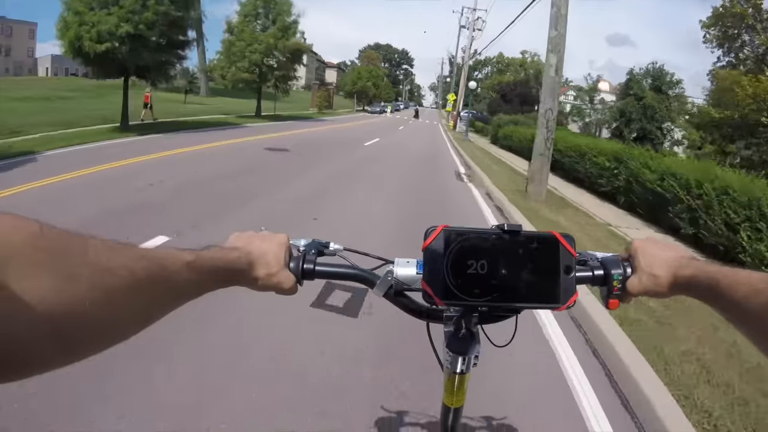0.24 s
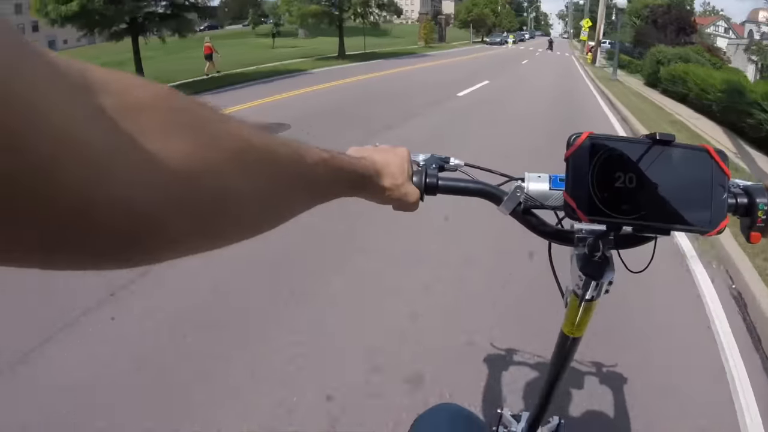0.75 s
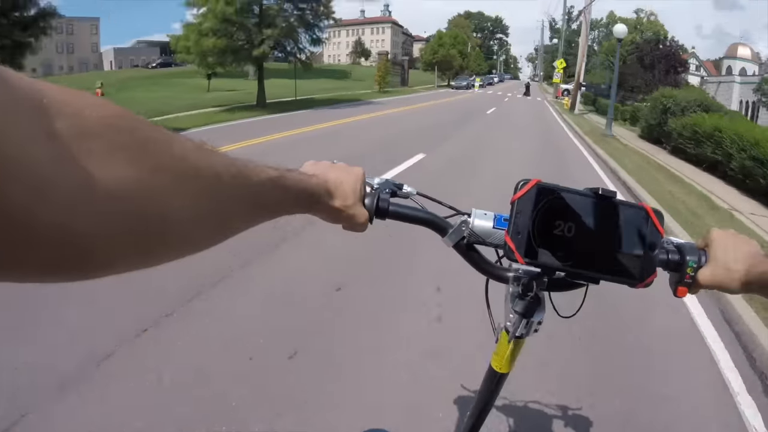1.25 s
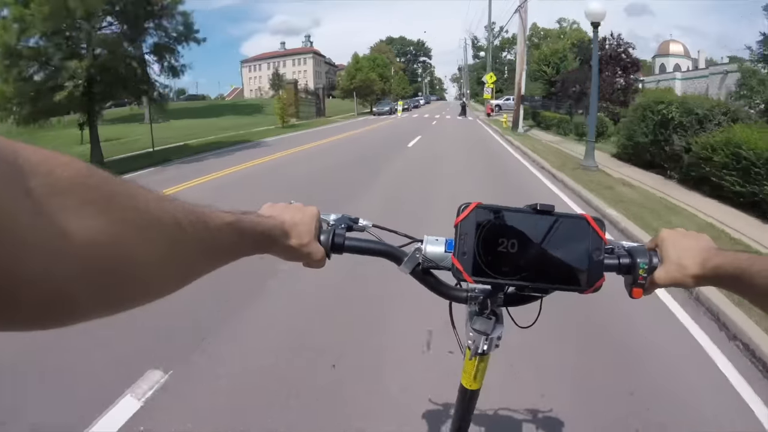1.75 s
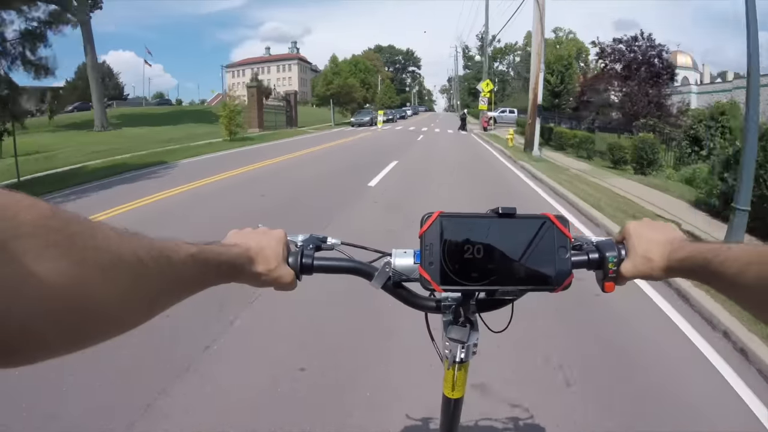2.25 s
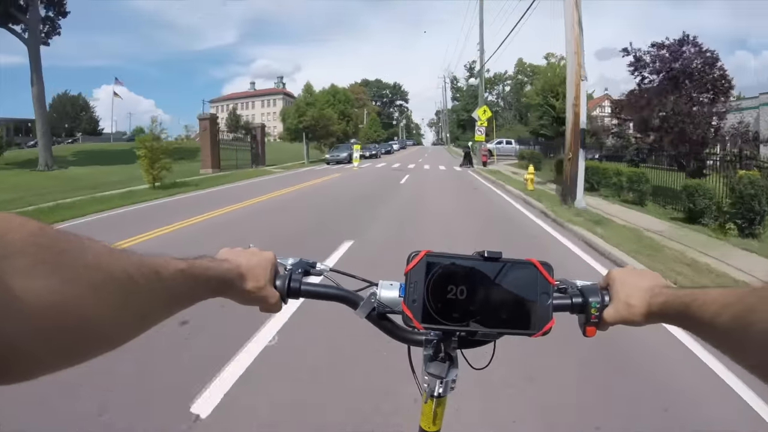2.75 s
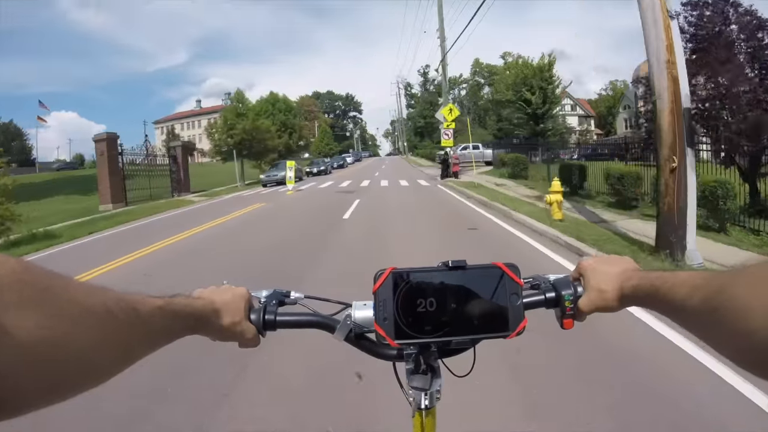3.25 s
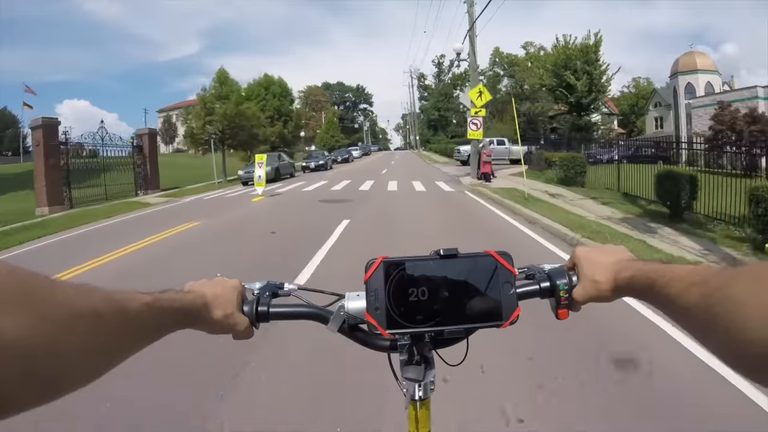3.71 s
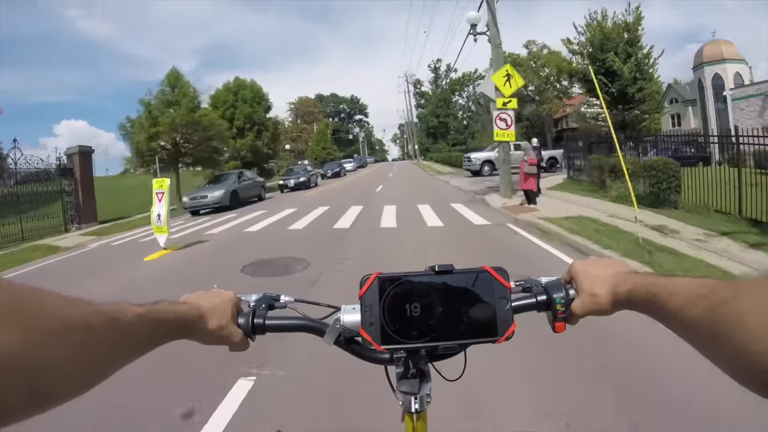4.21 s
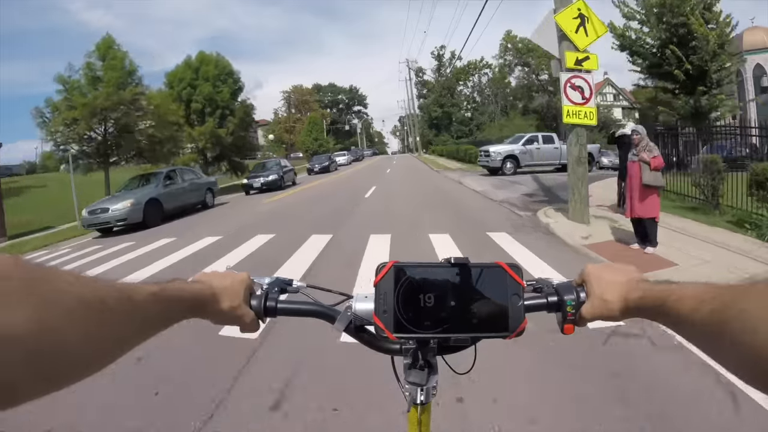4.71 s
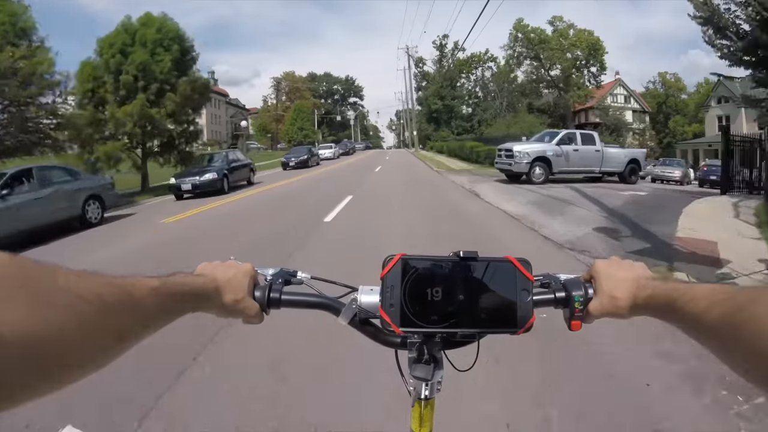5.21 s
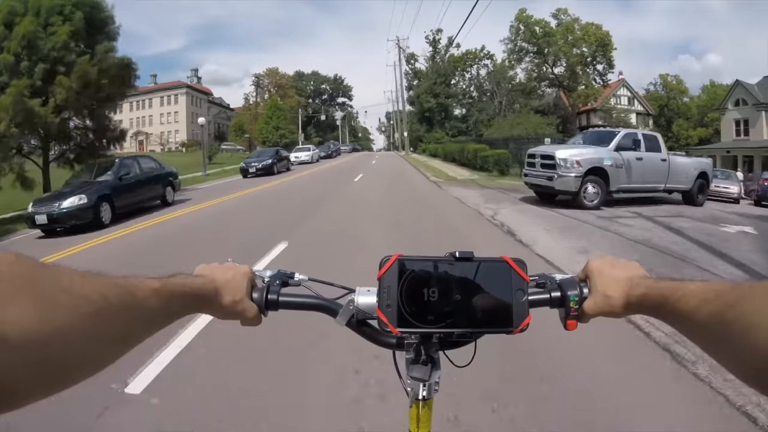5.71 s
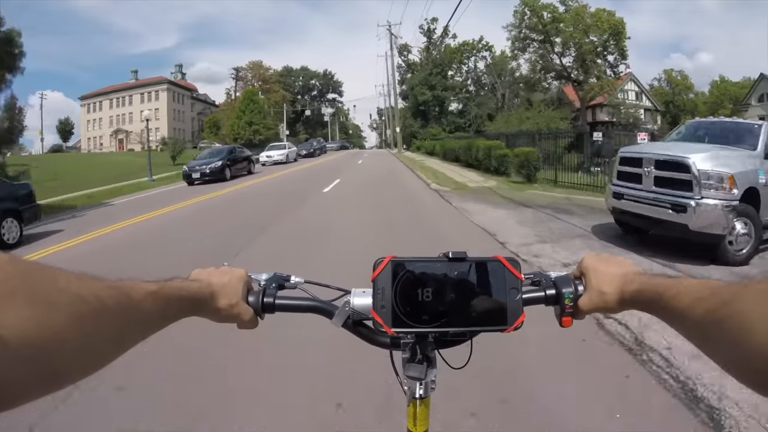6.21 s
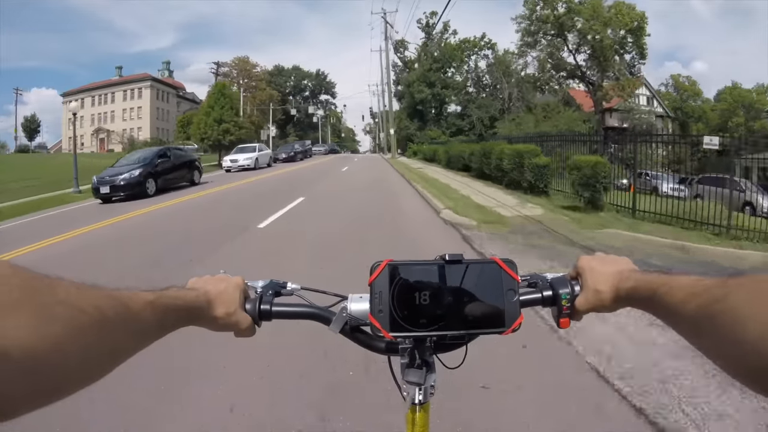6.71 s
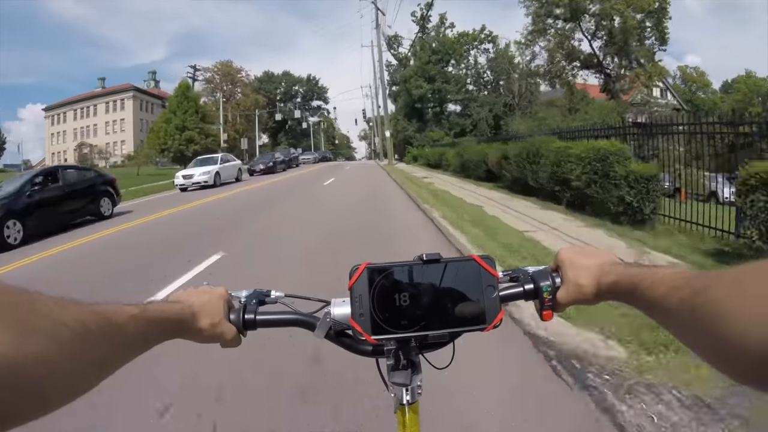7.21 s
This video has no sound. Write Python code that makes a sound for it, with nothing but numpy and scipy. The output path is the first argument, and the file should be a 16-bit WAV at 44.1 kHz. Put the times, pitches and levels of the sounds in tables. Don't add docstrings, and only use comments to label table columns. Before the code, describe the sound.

An electric scooter rides along an open road, heard from the rider's helmet. A constant mid-pitched drive whine with higher overtones wavers quickly as the wheel turns and drifts slightly lower. Beneath it lie tyre roar and thin hiss. Low wind gusts thump the microphone throughout, irregular and sometimes hard. Midway a loose part ticks briefly, and later the deck drums softly over painted stripes.

```python
import sys
import numpy as np
from scipy import signal
from scipy.fft import rfft, irfft, next_fast_len
from scipy.io import wavfile
from scipy.ndimage import uniform_filter1d

SR = 44100
rng = np.random.default_rng(int(sys.argv[2]) if len(sys.argv) > 2 else 0)


def bounce(signal):
    frames = np.transpose(np.atleast_2d(signal))
    limited = np.clip(frames, -1, 1)
    pcm = np.round(limited * 32767).astype(np.int16)
    wavfile.write(sys.argv[1], SR, pcm)


def linear_from_db(decibels):
    return 10 ** (np.asarray(decibels, float) / 20)


N = 328646
TEETH = 55
MEAN_PULL_DB = -25

# (time [s], tooth rate [Hz], pull as tone level [dB])
DRIVE = [(0.0, 644.7, -25), (0.2, 646.3, -25), (0.45, 649.0, -21), (0.75, 646.6, -20.5), (1.05, 640.2, -19),
         (1.6, 636.2, -21.5), (1.85, 636.0, -23), (2.4, 635.2, -23), (2.8, 626.0, -23.5), (3.2, 622.0, -23),
         (3.6, 621.0, -27), (3.95, 613.0, -27), (4.25, 614.5, -26.5), (4.65, 604.0, -27.5),
         (5.45, 603.0, -25), (5.9, 596.0, -29), (6.85, 598.0, -27), (7.45, 591.5, -26)]
# (time [s], pressure [dB])
WIND = [(0.0, -23.5), (0.23, -22.5), (0.81, -18.5), (1.78, -19.5), (2.34, -19.5), (2.49, -21.5),
        (3.11, -21), (3.28, -28), (3.88, -22.5), (4.29, -28), (5.56, -17.5), (5.87, -21.5), (7.45, -20)]
# (centre [s], level [dB], length [s], sharpness [dB])
BUFFETS = [(0.134, -13, 0.034, -1.5), (1.103, -12, 0.017, -9.5), (1.217, -10.5, 0.01, -11),
           (1.291, -6, 0.021, -9), (1.722, -7.5, 0.02, -1.5), (1.934, -17.5, 0.013, -4),
           (2.202, -12, 0.032, -13), (2.279, -15.5, 0.029, -6), (2.421, -13, 0.036, -12),
           (2.515, -10, 0.02, -10.5), (2.939, -12, 0.02, -7), (3.174, -13.5, 0.023, 2.5),
           (3.276, -1.5, 0.01, -7), (3.511, -10, 0.03, -4), (3.604, -9.5, 0.031, -5.5),
           (3.744, -14, 0.019, -13), (4.072, -13, 0.028, -3.5), (4.395, -14, 0.022, -1.5),
           (4.598, -14, 0.031, -3), (4.828, -10, 0.016, -6.5), (5.452, -12, 0.013, -5.5),
           (5.561, -8.5, 0.016, -4), (5.597, -11.5, 0.013, 0), (5.673, -8, 0.013, -7.5),
           (5.956, -14, 0.043, -7.5), (6.365, -10.5, 0.02, -8), (6.496, -6.5, 0.024, -7),
           (6.725, -11.5, 0.015, -13), (7.262, -9.5, 0.028, -5), (7.39, -8.5, 0.021, -7)]
# (centre [s], length [s], heave [dB])
SURGES = [(0.599, 0.066, -10.5), (0.66, 0.071, -15.5), (0.76, 0.036, -13), (0.882, 0.058, -17.5),
          (0.952, 0.022, -14), (1.03, 0.047, -15), (1.07, 0.025, -17), (1.182, 0.087, -20),
          (1.473, 0.098, -17), (2.085, 0.025, -9.5), (2.367, 0.04, -14), (3.442, 0.05, -9),
          (3.806, 0.035, -8), (3.921, 0.08, -13), (4.208, 0.028, -11), (4.286, 0.07, -13),
          (4.49, 0.039, -11.5), (5.067, 0.04, -16), (5.35, 0.078, -16.5), (5.802, 0.09, -18.5),
          (6.094, 0.039, -15), (6.15, 0.067, -10), (6.577, 0.032, -15), (6.85, 0.026, -13),
          (6.945, 0.041, -11.5), (7.061, 0.048, -18), (7.18, 0.06, -17)]


def rms_one(x):
    return x / np.sqrt(np.mean(x ** 2) + 1e-20)


def in_time(rows):
    s, *columns = np.transpose(rows)
    return [np.interp(np.arange(N) / SR, s, c) for c in columns]


def noise(spectrum):
    hz, db = np.transpose(spectrum)
    size = next_fast_len(N, real=True)
    bins_hz = np.arange(size // 2 + 1) * SR / size + 1e-3
    octaves_outside = np.log2(np.maximum(np.maximum(hz[0] / bins_hz, bins_hz / hz[-1]), 1))
    shape = linear_from_db(np.interp(np.log(bins_hz), np.log(hz), db) - 25.0 * octaves_outside)
    return rms_one(irfft(rfft(rng.standard_normal(size)) * shape, size)[:N])


def drift(rate):
    r = np.exp(-80 * np.pi * rate / SR)
    slow = signal.lfilter([1], [1, -2 * r, r * r], rng.standard_normal(N // 40 + 2002))[2000:]
    return np.interp(np.arange(N) / 40, np.arange(len(slow)), rms_one(slow))


def resonance(x, hz, width_hz):
    r = np.exp(-np.pi * width_hz / SR)
    poles = [1, -2 * r * np.cos(2 * np.pi * hz / SR), r * r]
    return signal.lfilter([(1 - r * r) / 2, 0, (r * r - 1) / 2], poles, x)


def twice_resonant(x, hz, width_hz):
    return resonance(resonance(x, hz, width_hz), hz, width_hz)


def evened(x, over_s):
    size = max(int(over_s * SR), 3)
    power = uniform_filter1d(uniform_filter1d(x ** 2, size), size)
    return x / np.sqrt(power + 0.0067)


def around(s, length):
    return slice(max(int((s - 2 * length) * SR), 0), int((s + 2 * length) * SR))


def controls():
    # (time [s], microphone gain as air hiss [dB], coarseness of the road [dB])
    roll = [(0.0, -59, 29), (0.02, -53, 18), (0.25, -52, 20), (0.8, -48.5, 18), (1.25, -48, 16.5),
            (1.55, -50.5, 17.5), (1.8, -51.5, 17), (2.66, -52.5, 19.5), (3.09, -51.5, 20.5),
            (3.48, -53.5, 21), (3.7, -55.5, 21.5), (4.67, -53.5, 19), (5.44, -47.5, 21), (5.79, -52, 20),
            (6.05, -52.5, 19.5), (6.7, -50.5, 21.5), (7.03, -50.5, 22.5), (7.45, -50, 18.5)]
    tooth_hz, tone_db = in_time(DRIVE)
    gain_db, coarse_db = in_time(roll)
    return tooth_hz, tone_db - MEAN_PULL_DB, gain_db - gain_db.mean(), coarse_db - coarse_db.mean()


def wheel_angle():
    tooth_hz = in_time(DRIVE)[0] * (1 + 0.0008 * drift(7.64))
    return 2 * np.pi * np.cumsum(tooth_hz) / SR / TEETH


def run_out(wheel, sizes):
    throb_orders = (1, 2, 5)
    return sum(size * np.sin(n * wheel + rng.uniform(0, 2 * np.pi)) for n, size in zip(throb_orders, sizes))


def frame(x):
    # (frequency [Hz], width [Hz], lift [dB])
    rings = [(257.5, 22, 8.5), (2890, 120, 5.5), (3223, 55, 8), (4280, 120, 1.5), (5100, 144, 6),
             (1052, 130, 1.5), (6570, 370, 3), (9100, 250, 4), (10900, 750, 4), (12900, 500, 2)]
    for hz, width_hz, lift_db in rings:
        x = x + (linear_from_db(lift_db) - 1) * resonance(x, hz, width_hz)
    return x


def tooth_levels():
    # (frequency [Hz], level at mean pull [dB])
    mount = [
        [(1188, -44.5), (1208, -37.5), (1240, -42.5), (1254, -42), (1276, -47), (1298, -40.5)],
        [(1780, -50), (1800, -46), (1836, -60), (1866, -46), (1905, -47), (1917, -41), (1945, -47.5)],
        [(2370, -43), (2410, -43.5), (2455, -49), (2495, -49.5), (2530, -55), (2590, -63)],
    ]
    mount_follows = (0.45, 0.99, 0.97)
    tooth_hz, pull_db = controls()[:2]
    levels = [MEAN_PULL_DB + pull_db]
    for k, (response, share) in enumerate(zip(mount, mount_follows), 2):
        levels.append(np.interp(k * tooth_hz, *np.transpose(response)) + share * pull_db)
    return levels


def tooth_tones(wheel):
    # (depth [dB], phase wobble [rad])
    throb = [(2.5, 0.58), (2.5, 0.22), (-2, 0.084)]
    halo_levels = (-12.5, -5, -9, -13)
    throb_shares = (0.39, 1.24, 0.28, 0.21)
    depth_db, wobble = np.transpose(throb)
    tones = 0
    for k, (level_db, halo_db, share) in enumerate(zip(tooth_levels(), halo_levels, throb_shares), 1):
        throb_db = share * (run_out(wheel, depth_db) + .5 * drift(9.3))
        phase = k * TEETH * wheel + share * run_out(wheel, wobble)
        halo = linear_from_db(halo_db) * (drift(60.0) * np.sin(phase) + drift(45.0) * np.cos(phase))
        tones = tones + linear_from_db(level_db + throb_db) * (np.sqrt(2) * np.sin(phase) + halo)
    return tones


def weak_orders(wheel, gain):
    pinion_orders = (50, 60, 65, 70, 75, 100, 115, 120)
    # (level at start [dB], level at end [dB])
    pinion_db = [(-53, -66.5), (-44, -57), (-45, -49), (-43.5, -80), (-45, -44), (-53, -40), (-58, -65),
                 (-54.5, -51)]
    upper_orders = (1.5, 2.5, 3.5, 4.5, 5, 5.5, 6, 6.5, 7, 7.5, 8, 8.5)
    # (level at start [dB], level at end
    # [dB])
    upper_db = [(-46, -43), (-72, -46), (-81, -67), (-89, -56), (-57, -78), (-56.5, -62), (-66, -59.5),
                (-71, -60.5), (-53, -66), (-58, -93), (-57, -70), (-68, -67.5)]
    hum_orders, hum_db = (31.7, 32.7), [(-47.5, -40.5), (-42, -47)]
    orders = [*pinion_orders, *TEETH * np.array(upper_orders), *hum_orders]
    weak, pull_db = 0, 0.23 * controls()[1]
    for n, (start_db, end_db) in zip(orders, [*pinion_db, *upper_db, *hum_db]):
        level_db = np.linspace(start_db, end_db, N) + pull_db + 2.37 * drift(4.7)
        weak = weak + linear_from_db(level_db) * np.sin(n * wheel + (1 + n / 70) * drift(6.0))
    return np.sqrt(2) * gain * frame(weak)


def rubbed(wheel, modes, level_db):
    rub = rng.standard_normal(N) * linear_from_db(run_out(wheel, (.8, 1.6, 1.4)) + 1.5 * drift(9.0))
    rung = 0
    for hz, width_hz, db in modes:
        rung = rung + linear_from_db(db) * evened(rms_one(twice_resonant(rub, hz, width_hz)), .12)
    return linear_from_db(level_db - 3.5) * rung


def housing(wheel):
    # (frequency [Hz], width [Hz], level [dB])
    housing_modes = [(4928, 120, -1.5), (5100, 170, -2)]
    # (tooth multiple [1], ring [Hz], reach [Hz], lift [dB])
    housing_wakes = [(8, 5010, 60, 9), (8.5, 5128, 25, 6)]
    tooth_hz, pull_db, gain_db, _ = controls()
    woken_db = 0
    for k, hz, reach_hz, db in housing_wakes:
        woken_db = woken_db + db / (1 + ((k * tooth_hz - hz) / reach_hz) ** 2)
    return rubbed(wheel, housing_modes, -51 + .5 * pull_db + 0.61 * gain_db + woken_db)


def pulley(wheel):
    # (frequency [Hz], width [Hz], level [dB])
    pulley_modes = [(2991, 140, -2.5), (4450, 45, -11), (3990, 57, -10)]
    _, pull_db, gain_db, _ = controls()
    full_pull_db = 4
    level_db = -52 + 2.72 * np.minimum(pull_db, full_pull_db) + 1.1 * gain_db
    return rubbed(wheel, pulley_modes, level_db)


def rolling(wheel):
    # (frequency [Hz], density [dB per Hz])
    tyre_roar = [(150, -31), (260, -2.5), (330, -10), (500, -6.5), (800, -6), (1150, -7), (1400, -16.5),
                 (1600, -28)]
    fork_noise = [(1200, 4.5), (1450, 4.5), (1700, 0.5), (2100, 4), (2500, -6), (2800, -24)]
    frame_noise = [(2300, 1.5), (2700, 3), (3400, 2.5), (4000, -1), (4800, 1), (5600, -7), (6000, -45)]
    air_hiss = [(3240, -39), (5500, -1.5), (5810, -2), (6500, 2.5), (7720, -5.5), (9010, -8), (9800, -8.5),
                (10900, -6.5), (12100, -15), (13300, -14), (15000, -31)]
    # (mean [dB], share of the road's coarseness [1], share of the pull [1])
    roll_mix = [
        (-32.5, 1, .01),
        (-42, 0.49, 0.033),
        (-48, 0.27, 0.49),
        (-52, .01, .01),
    ]
    grain, out = drift(3.5), 0
    pull_db, gain_db, coarse_db = controls()[1:]
    for spectrum, (mean_db, road, pull) in zip((tyre_roar, fork_noise, frame_noise, air_hiss), roll_mix):
        level_db = mean_db + gain_db + road * coarse_db + pull * pull_db
        flutter_db = 0.42 * grain + .5 * drift(13.0) + run_out(wheel, (.4, .7, .6))
        out = out + linear_from_db(level_db + 2.0 + flutter_db) * rms_one(frame(noise(spectrum)))
    return out


def whistles():
    # (frequency [Hz], width [Hz], level [dB])
    cable_bands = [(6220, 53, -65), (8700, 90, -76), (9150, 120, -79)]
    air, out = rng.standard_normal(N), 0
    for hz, width_hz, db in cable_bands:
        out = out + linear_from_db(db + 3 * drift(.8)) * rms_one(resonance(air, hz, width_hz))
    return out


def lumps():
    out = []
    for s, db, length, _ in BUFFETS:
        heave_db, thump_db = -13.5 - 0.21 * (db + 4), -15 + 0.26 * (db + 14.5)
        out.append((s - 0.0045, 0.032 + 0.98 * length, heave_db, thump_db))
    return out + [(s, length, db, db - 4) for s, length, db in SURGES]


def surges():
    # (frequency [Hz], density [dB per Hz])
    heave_band = [(10, -3.5), (25, -0.5), (45, 0), (60, -7)]
    thump_band = [(50, 2.5), (62, 3), (85, 1.5), (115, -7.5)]
    base_db = in_time(WIND)[0] + 3.1 * drift(7.4)
    heave, thump = linear_from_db(2 * (base_db + 0.5)), linear_from_db(2 * (base_db - 4.0))
    t = np.arange(N) / SR
    for s, length, heave_db, thump_db in lumps():
        near = around(s, length)
        bell = np.exp(-(2 * (t[near] - s) / (0.88 * length)) ** 2)
        heave[near] += linear_from_db(2 * heave_db) * bell
        thump[near] += linear_from_db(2 * thump_db) * bell ** 2.1
    heaving = np.sqrt(heave) * evened(noise(heave_band), 0.024)
    return heaving + np.sqrt(thump) * evened(noise(thump_band), 0.021)


def eddies():
    dull = [(s, db - 5.5, 0.59 * length, -14) for s, length, db in SURGES]
    return [*BUFFETS, *dull]


def headwind():
    # (time [s], level [dB])
    snaps = [
        (3.502, -16),
        (3.599, -22),
        (1.716, -23),
        (1.7, -20),
    ]
    flutter_db = -27 + (in_time(WIND)[0] + 20)
    thud, edge, spit = np.zeros((3, N))
    t = np.arange(N) / SR
    for s, db, length, sharp_db in eddies():
        near = around(s, length)
        bell = np.exp(-.7 * (2 * (t[near] - s) / (0.97 * length)) ** 2)
        thud[near] += linear_from_db(db) * bell
        edge[near] += linear_from_db(db + sharp_db) * bell ** 1.95
        spit[near] += linear_from_db(1.57 * (db + sharp_db) - 6) * bell ** 15.0
    for s, db in snaps:
        rise_or_fall_s = np.where(t < s, .001, .003)
        spit += linear_from_db(db) * np.exp(-((t - s) / rise_or_fall_s) ** 2)
    out = surges()
    out += linear_from_db(flutter_db + 1.9 * drift(26.0)) * noise([(90, 4.0), (120, 0.5), (200, -6.5), (320, -18.5)])
    out += thud * evened(noise([(60, -5.0), (110, 3.0), (180, -3.5), (280, -12.5)]), 0.012)
    out += edge * evened(noise([(220, -2), (350, -0.5), (560, -9), (800, -16)]), 0.0025)
    out += .25 * (out ** 2 - uniform_filter1d(out ** 2, size=SR // 20))
    return out + spit * evened(noise([(600, -0.5), (1000, 7), (1600, -13), (3500, -29)]), 0.0016)


def rattles():
    # (start [s], length [s], level [dB])
    click_runs = [
        (3.489, 0.011, -39),
        (3.537, 0.017, -41),
        (3.587, 0.0093, -46),
        (4.076, .11, -44),
    ]
    # (frequency [Hz], width [Hz], level [dB])
    rattle_modes = [(3510, 70, 10), (3650, 90, -1), (3840, 60, 0), (4100, 100, -14), (3100, 98, -6)]
    clicks = np.zeros(N)
    for s, length, db in click_runs:
        first, n = int(s * SR), int(length * SR)
        chance, height = rng.random((2, int(.2 * SR)))[:, :n]
        struck = chance < 2000 / SR
        clicks[first:first + n] = linear_from_db(db + 37) * struck * (height - .5) * np.hanning(n) ** .5
    return sum(linear_from_db(db) * resonance(clicks, hz, width_hz) for hz, width_hz, db in rattle_modes)


def crossing():
    middle_s, half_s, drum_hz, width_hz = 5.05, 0.22, 114, 14
    over = np.exp(-((np.arange(N) / SR - middle_s) / half_s) ** 4)
    drum = twice_resonant(rng.standard_normal(N), drum_hz, width_hz)
    return linear_from_db(-25) * over * rms_one(drum)


def scene():
    wheel, gain = wheel_angle(), linear_from_db(controls()[2])
    drive = tooth_tones(wheel) + weak_orders(wheel, gain) + housing(wheel) + pulley(wheel)
    road = rolling(wheel) + crossing()
    air = gain * whistles() + headwind()
    return (drive + road + air + rattles())[None]


def low_pass(x):
    return signal.sosfilt(signal.butter(12, 15100, fs=SR, output="sos"), x)


def record(dry):
    # (time [s], drop [dB], recovery [s])
    gain_cuts = [
        (1.291, 4, 0.11),
        (3.61, 1, 0.23),
        (5.57, 1.5, 0.086),
    ]
    t = np.arange(N) / SR
    cut_db = 0
    for s, db, back_s in gain_cuts:
        onset = np.clip((t - s) / 0.0071, 0, 1)
        cut_db = cut_db + db * np.exp(-np.abs(t - s) / back_s) * onset
    x = dry * linear_from_db(-cut_db) / 1.019
    return low_pass(0.97 * np.tanh(x + x ** 3 / 3.2))


dry = scene()
out = record(dry)
bounce(out)
```